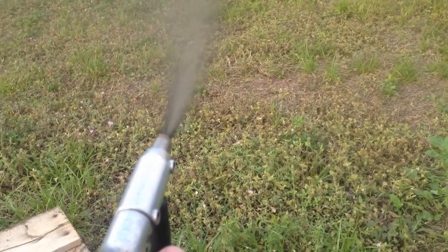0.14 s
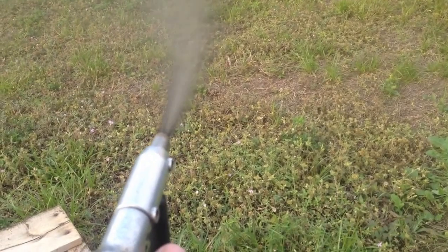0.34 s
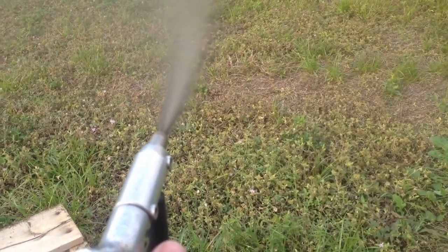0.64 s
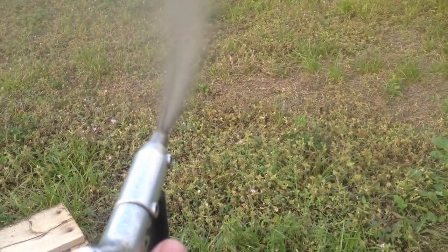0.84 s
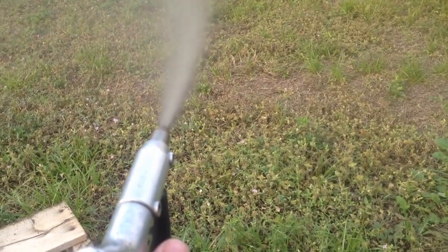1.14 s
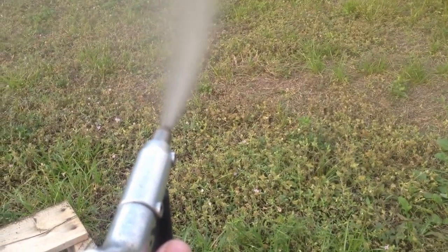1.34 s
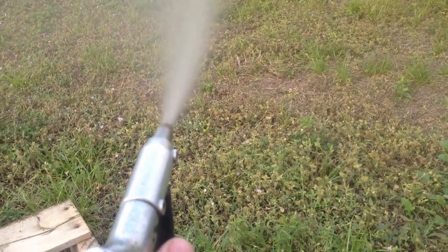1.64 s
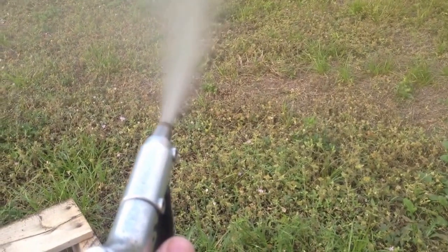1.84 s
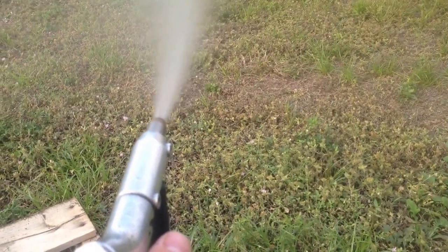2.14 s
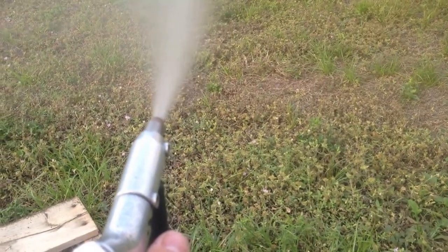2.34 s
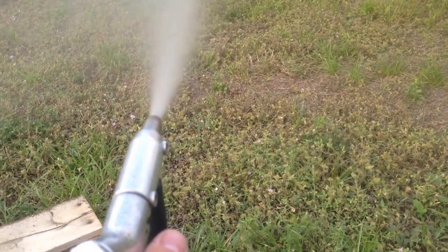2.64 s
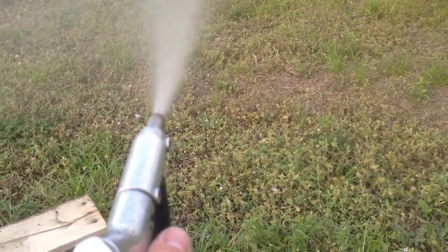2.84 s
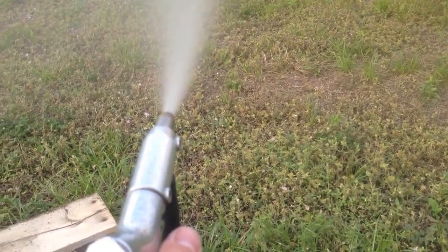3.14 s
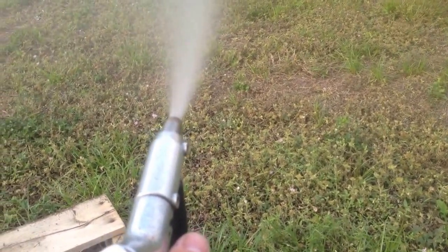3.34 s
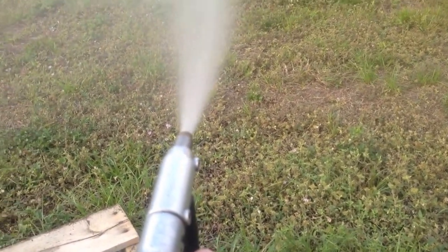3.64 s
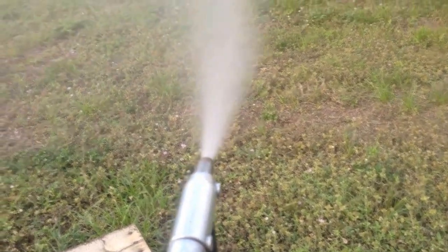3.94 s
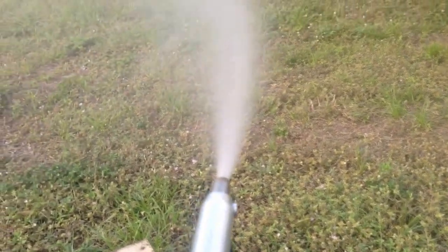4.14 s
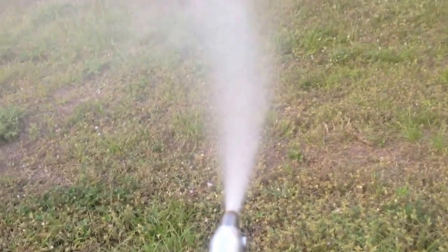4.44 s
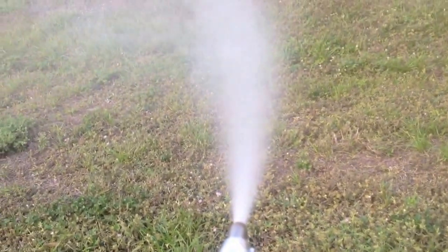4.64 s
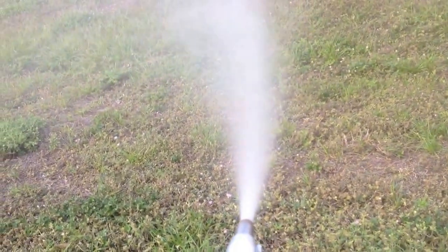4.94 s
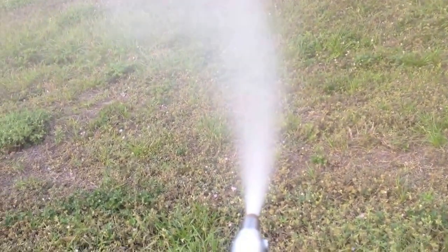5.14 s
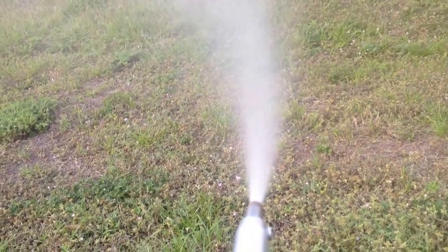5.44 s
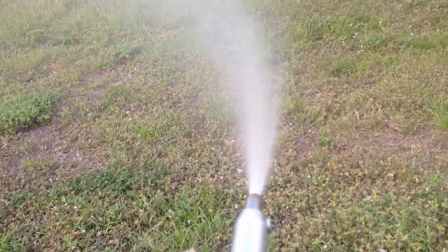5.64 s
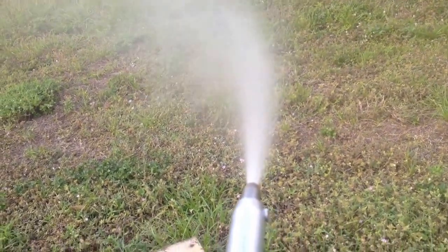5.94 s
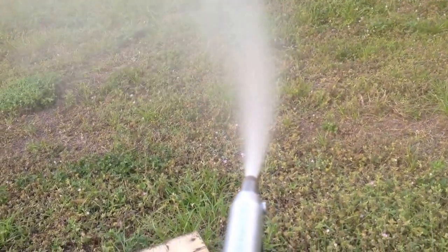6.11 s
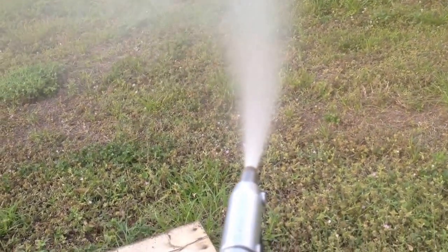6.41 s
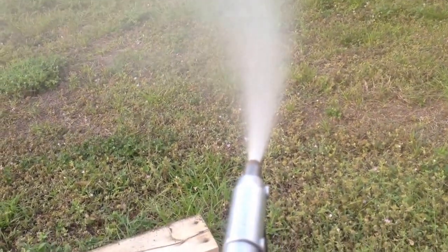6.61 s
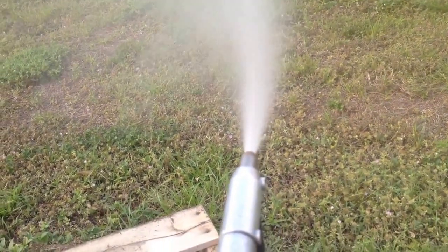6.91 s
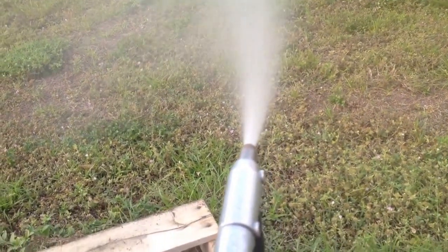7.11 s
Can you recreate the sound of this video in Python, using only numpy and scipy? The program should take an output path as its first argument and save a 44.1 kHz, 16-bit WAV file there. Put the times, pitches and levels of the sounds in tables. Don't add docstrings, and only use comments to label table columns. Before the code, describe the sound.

At arm's length outdoors, an already open spray gun blasts air and soapy water nonstop. The bright, dense hiss has a rougher roar beneath, irregular water spits and dull burps, and brief shallow dips as water chokes the nozzle. A thin, breathy whistle sits inside the hiss. Around four seconds the gun tilts and the tone shifts subtly. Faint breeze rumbles on the microphone.

```python
import sys
import numpy as np
from scipy import signal
from scipy.fft import rfft, irfft
from scipy.io import wavfile
from scipy.ndimage import uniform_filter1d

SR = 44100
rng = np.random.default_rng(int(sys.argv[2]) if len(sys.argv) > 2 else 0)


def invert_db(level):
    return 10 ** (np.asarray(level, dtype=float) / 20)


def to_wav(s):
    ch = np.atleast_2d(s).T
    pcm = np.round(np.clip(ch, -1, 1) * 32767)
    wavfile.write(sys.argv[1], SR, pcm.astype(np.int16))


N = 320607
FRAME = 2048
OVERLAP = FRAME * 3 // 4

JET_DB = -19.5
RECOVER_S, FALL_S = 0.31, 0.012
ROAR_FOLLOWS, FIZZ_FOLLOWS = 0.81, 0.85
GAP_HZ, GAP_PER_HZ = 200, 0.66
STIR_DB, STIR_S = 3, 0.027

# [t/s, depth/dB]
CHOKES = [(.32, 1.5), (.6, 1.2), (1.3, 2), (1.55, 1), (1.96, 1.5), (2.4, 0.6), (2.62, 1.5), (3.09, 1.2),
          (3.55, 1.5), (3.89, 2.5), (4.2, 2), (4.55, 1), (4.85, 2.5), (5.2, 1.5), (5.72, 1.8), (6.05, 3.5),
          (6.12, 1), (6.84, 1), (7.17, 2)]
# [t/s, peak level/dB]
SLUGS = [(0.06, -21), (0.086, -15), (0.158, -9), (0.368, -7), (0.923, -18), (1.071, -39), (1.673, -10),
         (2.22, -6), (2.266, -32), (2.431, -41), (3.222, -24), (3.731, -33), (3.834, -8), (4.179, -5),
         (4.573, -19), (4.762, -6), (5.014, -23), (5.294, -27), (5.825, -9), (5.844, -19), (5.918, -5.5),
         (6.347, -21), (6.509, -12)]
# [t/s, peak level/dB]
BURPS = [(0.236, -18), (0.3, -19), (0.547, -17), (0.7, -16), (0.815, -20), (0.878, -14.5), (0.924, -17),
         (1.072, -20), (1.19, -17), (1.377, -15), (1.614, -16.5), (1.836, -21), (2.386, -16), (2.431, -16),
         (3.031, -20), (3.293, -16), (3.732, -18), (4.163, -19), (4.568, -18), (4.628, -18), (5.136, -19),
         (5.528, -19), (5.707, -23), (5.845, -18), (6.168, -20), (6.237, -17), (6.283, -18), (6.702, -18)]
# [t/s, f/Hz, level over the hiss/dB]
WHISTLE = [
    (0, 6010, -6.5),
    (1.6, 6040, -6),
    (2.2, 6040, -4),
    (2.9, 6080, -4.5),
    (3.5, 6000, -3),
    (4.6, 5950, -5.5),
    (5.4, 5970, -5),
    (6.55, 5930, -6.5),
    (6.7, 5810, -6),
    (7.27, 5730, -4),
]
# [t/s, share of the tilted pose 0-1]
TILT = [
    (0, 0),
    (3.75, 0.1),
    (4.15, 0.77),
    (7.27, 0.74),
]
# [f/Hz, level per Hz/dB]
LEVEL_GUN = [(300, -27.5), (400, -29.5), (500, -15.5), (620, -10.5), (760, -9), (1100, -7.5), (2900, -12.5),
             (3700, -10.5), (4600, -4.5), (5300, -3.5), (7000, -0.85), (9800, -5.5), (13300, -3),
             (15200, -4)]
TILTED_GUN = [(300, -23), (400, -30.5), (500, -15.5), (620, -16.5), (760, -10), (1100, -9.5), (2900, -9.5),
              (3700, -11), (4600, -7), (5300, -3), (7000, -1.2), (9800, -4), (13300, -2.5), (15200, -0.8)]
# [f/Hz, width/Hz, level with gun level/dB, level with gun tilted/dB]
HOLLOW = [(1090, 24, 1.5, -1), (1890, 24, -8, 1), (2840, 60, -2.5, 2), (1975, 49, 0.8, 3),
          (2670, 42, 1, 1.5), (3040, 20, -7, -2), (3810, 42, -.5, -8), (4660, 74, -0.5, 2.5),
          (5600, 140, -2.5, 0), (13200, 980, 3, 2)]
# [t/s, delay/ms, share of the direct sound]
GROUND = [(0.2, 2.972, 0.16), (1.0, 2.975, 0.15), (1.8, 3.022, 0.15), (3.0, 3.032, 0.13),
          (4.1, 3.057, 0.08), (4.7, 3.03, 0.08), (5.4, 3.016, 0.09), (6.6, 3.036, 0.07), (7.1, 3.03, 0.07)]
# [delay/ms, share of the direct sound]
LEVEL_ECHOES = [(0.624, -0.1), (1.37, -0.06), (1.691, -0.12), (2.037, -0.06), (2.272, 0.06), (2.635, 0.07),
                (2.982, 0.12), (3.28, -0.1), (3.597, -0.08), (3.918, 0.1), (4.448, 0.11)]
TILTED_ECHOES = [(0.552, -0.26), (0.689, -0.09), (1.109, 0.07), (1.496, 0.17), (1.962, 0.12), (2.312, 0.05),
                 (3.024, 0.16), (3.281, -0.12), (3.609, -0.1), (3.727, -0.08), (4.18, -0.11)]
# [t/s, level/dB]
BREEZE = [(0, -65), (.6, -67), (1.2, -64), (1.45, -68), (2.3, -62.5), (3.3, -65), (4.5, -64.5),
          (5.2, -62.5), (5.6, -62.5), (6.1, -67), (6.3, -67), (6.9, -65), (7.27, -59)]
# [f/Hz, level per Hz/dB]
BREEZE_COLOUR = [(12, -46), (25, -6), (71, 10.5), (172, 0.5), (252, 7), (365, -15), (420, -17), (550, -37),
                 (920, -120)]
# [t/s, peak level/dB, centre f/Hz, length/s]
GUSTS = [(0.24, -42, 420, 0.04), (0.977, -35, 91.5, 0.041), (1.006, -44, 250, 0.035),
         (1.035, -36, 190, 0.03), (1.125, -46, 150, 0.04), (1.23, -53, 90, 0.057),
         (2.327, -37, 75.4, 0.035), (2.357, -38, 94.2, 0.028), (2.6, -40, 110, 0.036),
         (3.855, -39, 200, 0.055), (3.884, -47, 120, 0.045), (5.27, -42, 90, 0.047),
         (5.383, -44, 70, 0.042), (5.68, -53, 30, 0.09), (5.99, -55, 30, 0.09), (6.363, -30, 258, 0.05),
         (6.375, -37, 105, 0.045), (6.656, -31, 121, 0.038), (6.684, -45, 113, 0.033)]
# [t/s, lowest f/Hz, highest f/Hz]
SPLITS = [(2.007, 8200, 9750), (2.007, 10900, 13950), (2.077, 11600, 13400), (2.1, 12900, 14700),
          (2.1, 4130, 5450), (2.147, 11550, 13950), (2.286, 5050, 6550), (2.611, 10250, 14050),
          (3.006, 11600, 13350), (4.492, 11600, 13300), (4.515, 4130, 5350), (4.538, 4130, 5350),
          (4.585, 10900, 12600), (4.863, 11600, 14650), (5.049, 5600, 7100), (5.374, 9550, 11900),
          (6.628, 4550, 6550), (6.628, 8850, 10500), (6.791, 4130, 5850), (6.86, 4550, 7800),
          (6.883, 6800, 8550)]


def evened(x):
    return x / np.sqrt(np.mean(x ** 2) + 1e-20)


def read(points, hz):
    f, value = np.transpose(points)
    return np.interp(np.log(hz + 1), np.log(f + 1), value)


def curves(rows, t):
    s, *columns = np.transpose(rows)
    return [np.interp(t, s, c) for c in columns]


def band(x, lo_hz, hi_hz, order=2):
    return signal.sosfilt(signal.butter(order, [lo_hz, hi_hz], "band", fs=SR, output="sos"), x)


def low_pass(hz):
    return signal.butter(1, hz, fs=SR)


def flutter(hz):
    return evened(signal.lfilter(*low_pass(hz), rng.standard_normal(N)))


def choked_db(t):
    table = np.array(CHOKES)
    since = np.maximum(t - table[:, :1], 0)
    shape = (1 - np.exp(-since / FALL_S)) * np.exp(-since / RECOVER_S)
    return -(table[:, 1:] * shape).sum(axis=0)


def spit(events, per_s, spread_db, lift_db, lag_s):
    sizes = invert_db(spread_db * np.minimum(rng.exponential(1, N), 4))
    pops = sizes * (rng.random(N) < per_s / SR)
    pops = evened(pops - pops.mean())
    s, db = np.transpose(events)
    pops[((s + lag_s) * SR).astype(int)] += invert_db(db + lift_db)
    return pops


def turbulence():
    eddies = rng.standard_normal(N) * invert_db(0.5 * flutter(80) + 0.25 * flutter(9))
    lumps = evened(rng.standard_normal(N) * invert_db(5.0 * flutter(166)))
    drops = 1.06 * lumps + 0.6 * spit(SLUGS, per_s=900, spread_db=4.0, lift_db=42.0, lag_s=0.0011)
    burps = 0.46 * lumps + 0.8 * spit(BURPS, per_s=230, spread_db=4.6, lift_db=54.0, lag_s=0.00344)
    flat = eddies + signal.lfilter(*low_pass(1300), drops - eddies)
    return flat + signal.filtfilt(*signal.butter(2, 750, fs=SR), burps - flat)


def resonate(x, hz, width_hz):
    turn = np.exp(2j * np.pi * np.cumsum(hz) / SR)
    r = np.exp(-np.pi * width_hz / SR)
    return 2 * (turn * signal.lfilter([1 - r], [1, -r], x / turn)).real


def nozzle_whistle():
    hz, db = curves(WHISTLE, np.arange(N) / SR)
    gap_hz = GAP_HZ + GAP_PER_HZ * (hz - 6000)
    hz = hz + 20 * flutter(11)
    whistle = np.zeros(N)
    for mode_hz in (hz - gap_hz / 2, hz + gap_hz / 2):
        once = resonate(rng.standard_normal(N), mode_hz, width_hz=270)
        whistle += resonate(once, mode_hz, width_hz=330)
    return invert_db(db + 0.3 * flutter(30)) * evened(whistle)


def jet_colour_db(hz, t, tilt):
    colour_db = (1 - tilt) * read(LEVEL_GUN, hz) + tilt * read(TILTED_GUN, hz)
    roar_db = (ROAR_FOLLOWS - 1) * choked_db(t)
    fizz_db = (FIZZ_FOLLOWS - 1) * choked_db(t)
    low = 1 / (1 + (hz / 4000) ** 6)
    bright = 1 / (1 + (11000 / (hz + 1)) ** 8)
    colour_db += low * (roar_db - roar_db.mean()) + bright * (fizz_db - fizz_db.mean())
    patches = uniform_filter1d(rng.standard_normal(colour_db.shape), size=24, axis=0)
    colour_db += 0.69 * evened(uniform_filter1d(patches, size=7, axis=1))
    for centre_hz, width_hz, level_db, tilted_db in HOLLOW:
        bump = np.exp(-((hz - centre_hz) / width_hz) ** 2)
        colour_db += ((1 - tilt) * level_db + tilt * tilted_db) * bump
    return colour_db - 10 * np.log10(1 + (330 / (hz + 1)) ** 6)


def echoes(taps, hz):
    return sum(share * np.exp(-2j * np.pi * hz * ms / 1000) for ms, share in taps)


def echo_path(hz, t, tilt):
    ms, share = curves(GROUND, t)
    ground = echoes([(ms - 0.05, -0.3 * share), (ms, share), (ms + 0.061, -0.55 * share)], hz)
    ground += echoes([(ms + 0.23, 0.45 * share * (1 - tilt))], hz)
    near = (1 - tilt) * echoes(LEVEL_ECHOES, hz) + tilt * echoes(TILTED_ECHOES, hz)
    dull = 1 / (1 + (hz / 5200) ** 12)
    return 1 + 0.87 * dull * near + 1.06 * (1 - dull) * ground


def jet():
    sources = [turbulence(), nozzle_whistle()]
    hz, t, z = signal.stft(sources, SR, nperseg=FRAME, noverlap=OVERLAP)
    hz = hz[:, None]
    tilt = curves(TILT, t)[0]
    path = echo_path(hz, t, tilt)
    hiss_gain = path * invert_db(jet_colour_db(hz, t, tilt))
    whistle_gain = 1 + 0.43 * (path - 1)
    z = z * np.array([hiss_gain, whistle_gain])
    hiss, whistle = signal.istft(z, SR, nperseg=FRAME, noverlap=OVERLAP)[1][:, :N]
    hiss /= np.std(band(hiss, 6600, 11000, order=4))
    return (hiss + whistle) * invert_db(JET_DB + choked_db(np.arange(N) / SR))


def rumble(t):
    hz = np.fft.rfftfreq(N, 1 / SR)
    noise = evened(irfft(rfft(rng.standard_normal(N)) * invert_db(read(BREEZE_COLOUR, hz)), N))
    stir = sum(np.exp(-((t - s - length / 2) / STIR_S) ** 2) for s, _, _, length in GUSTS)
    stir = np.minimum(stir, 1)
    return noise * invert_db(curves(BREEZE, t)[0] + STIR_DB * stir + 3.8 * flutter(12))


def open_air(t):
    level_db = -61.5 - 6.5 * curves(TILT, t)[0] + 2.5 * flutter(9)
    return invert_db(level_db) * evened(band(rng.standard_normal(N), 180, 380))


def gusts():
    out = np.zeros(N)
    for s, db, centre_hz, length in GUSTS:
        noise = rng.standard_normal(8000)
        gust = band(noise, 40 + 0.3 * centre_hz, 0.89 * centre_hz + 110, order=3)
        gust = gust[-int(np.clip(length, 0.01, 0.1) * SR):]
        gust = gust * np.hanning(len(gust))
        start = round(s * SR)
        out[start:start + len(gust)] += invert_db(db - 10.0) * evened(gust)
    return out


def breeze():
    t = np.arange(N) / SR
    out = rumble(t) + open_air(t) + gusts()
    return signal.lfilter(*signal.butter(2, 34, "high", fs=SR), out)


def scene():
    return np.tile(jet() + breeze(), (2, 1))


def drop_weak(x, under_db=-6.0, top_db=2.5, cut_db=-24.0, from_hz=1700):
    hz, _, z = signal.stft(x, SR, nperseg=FRAME, noverlap=OVERLAP)
    hz = hz[:, None]
    power = uniform_filter1d(abs(z) ** 2, size=4, axis=1)
    around = uniform_filter1d(power, size=27, axis=0)
    valley = uniform_filter1d(power, size=4, axis=0) / (around + 1e-20)
    limit = invert_db(under_db + top_db * (hz > 8000)) ** 2
    kept = 1 / (1 + (limit / (valley + 1e-9)) ** 8)
    kept = np.where(hz > from_hz, np.maximum(kept, invert_db(cut_db)), 1)
    return signal.istft(z * kept, SR, nperseg=FRAME, noverlap=OVERLAP)[1][:N]


def split_bands(out, dry):
    hz = np.fft.rfftfreq(FRAME, 1 / SR)
    window = signal.windows.kaiser_bessel_derived(FRAME, 4 * np.pi)
    for s, lo_hz, hi_hz in SPLITS:
        start = round(s * SR)
        at = slice(start, start + FRAME)
        inside = (hz > lo_hz) & (hz < hi_hz)
        spectrum = rfft(dry[0, at])
        shared = irfft(spectrum * inside)
        apart = irfft(rfft(rng.standard_normal(FRAME)) * abs(spectrum) * inside)
        apart = evened(apart) * shared.std()
        out[:, at] += window * (np.outer([0.7, -0.7], apart) - 0.3 * shared)
    return out


def top_cut(x):
    return signal.sosfilt(signal.butter(12, 16640, fs=SR, output="sos"), x)


def record(dry):
    out = np.tile(drop_weak(dry[0]), (2, 1))
    out = split_bands(out, dry)
    edge = signal.firwin(1501, 15300, window=("kaiser", 11), fs=SR)
    out = signal.oaconvolve(out, edge[None], "same")
    return top_cut(out)


dry = scene()
out = record(dry)
to_wav(out)
```